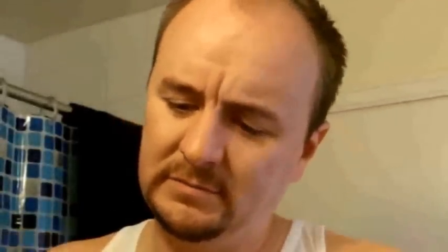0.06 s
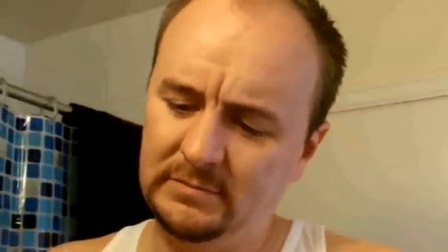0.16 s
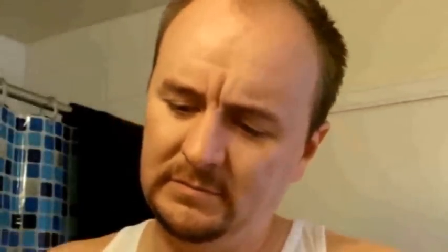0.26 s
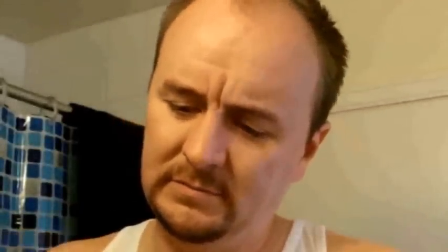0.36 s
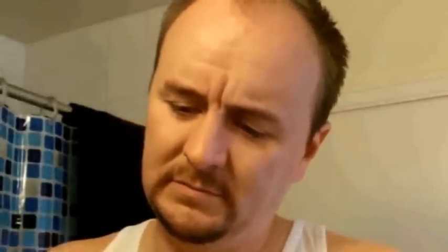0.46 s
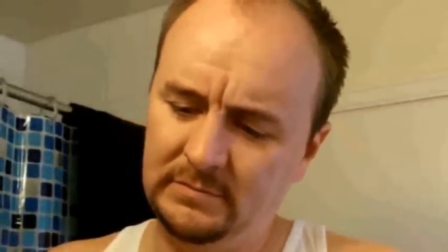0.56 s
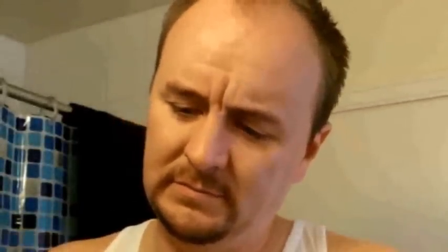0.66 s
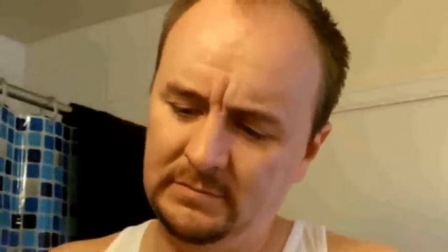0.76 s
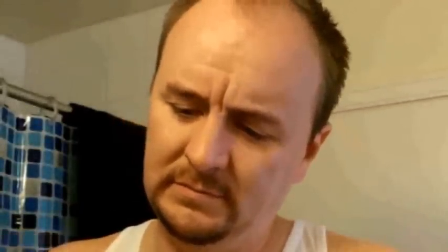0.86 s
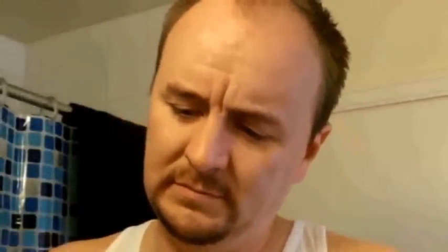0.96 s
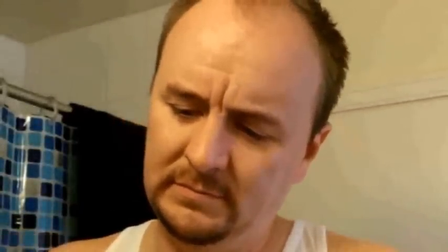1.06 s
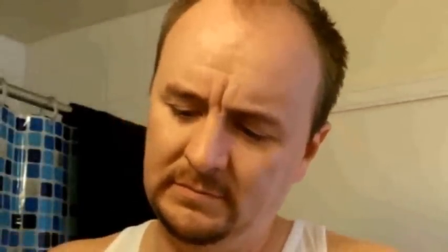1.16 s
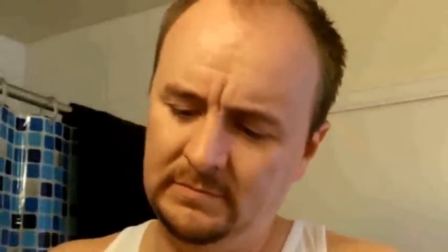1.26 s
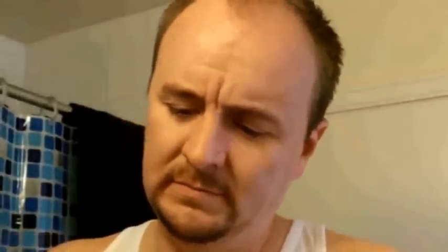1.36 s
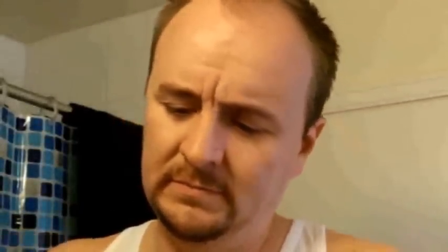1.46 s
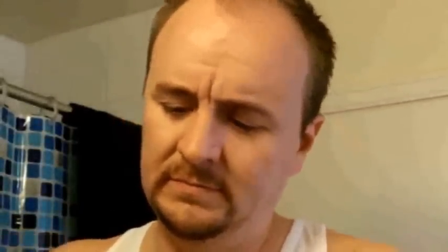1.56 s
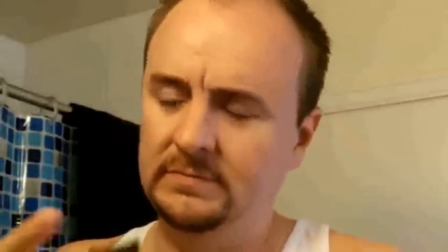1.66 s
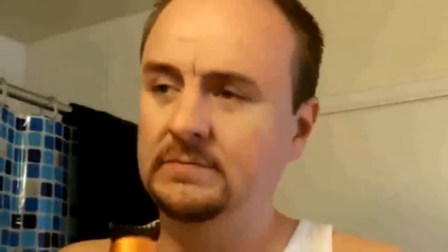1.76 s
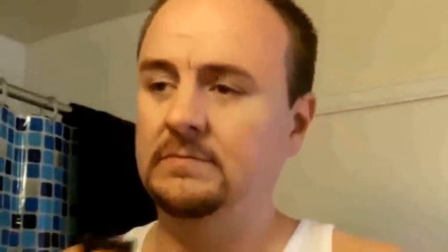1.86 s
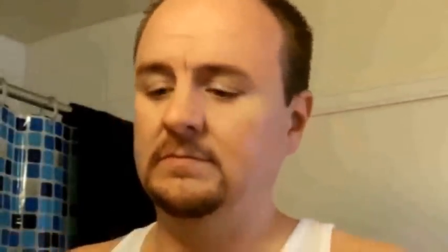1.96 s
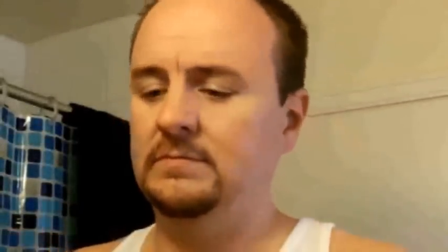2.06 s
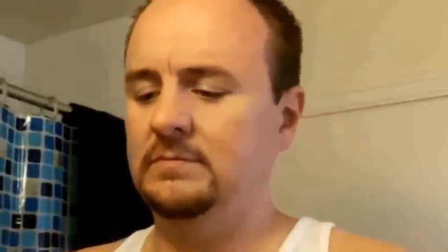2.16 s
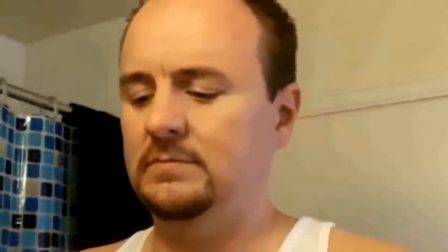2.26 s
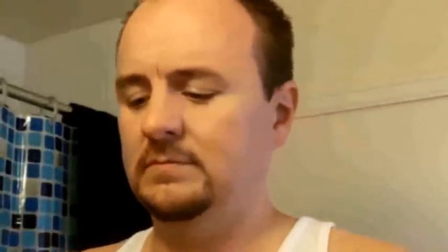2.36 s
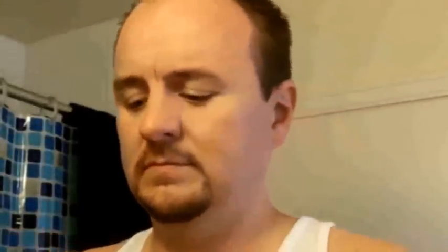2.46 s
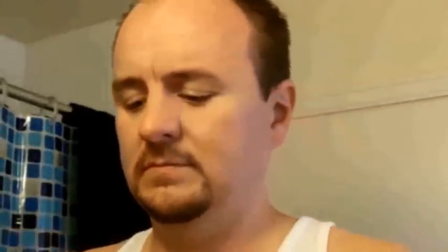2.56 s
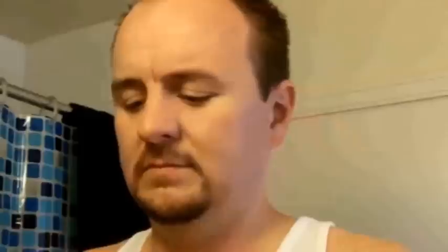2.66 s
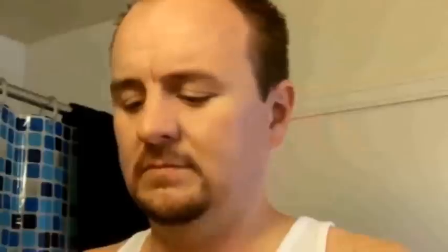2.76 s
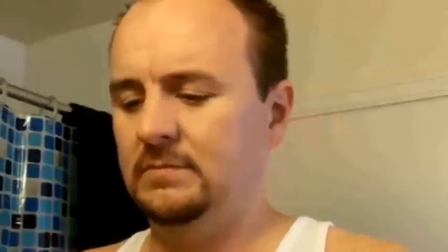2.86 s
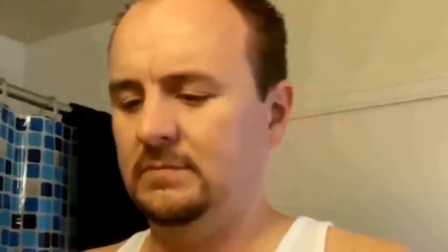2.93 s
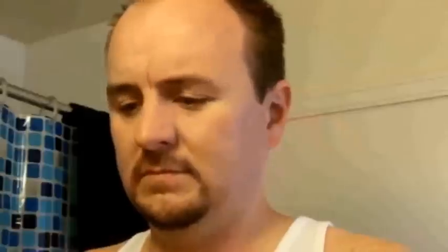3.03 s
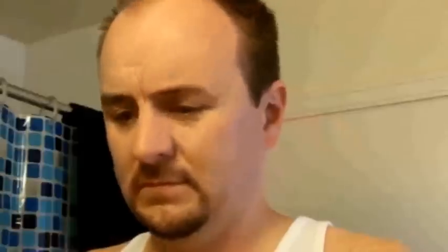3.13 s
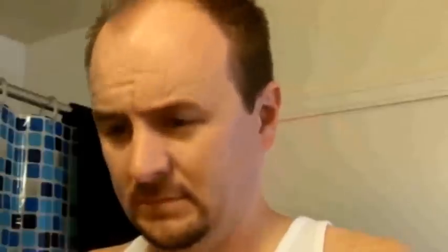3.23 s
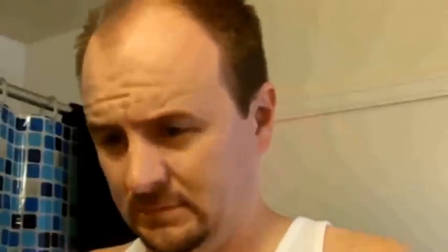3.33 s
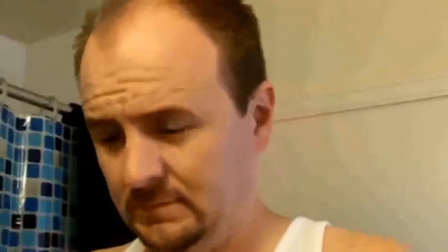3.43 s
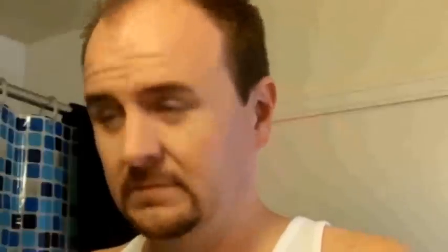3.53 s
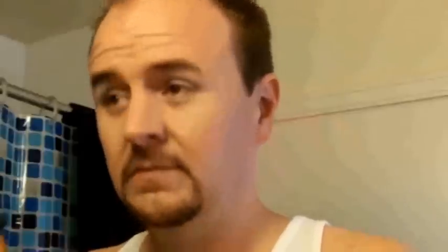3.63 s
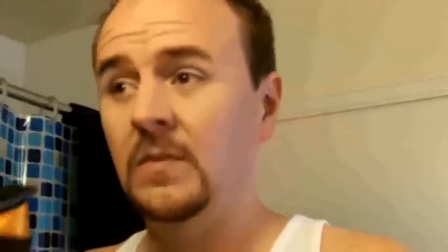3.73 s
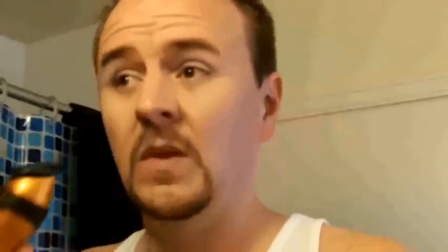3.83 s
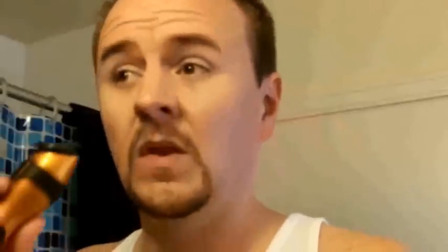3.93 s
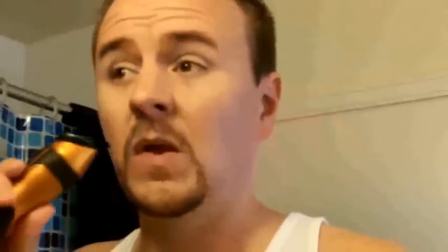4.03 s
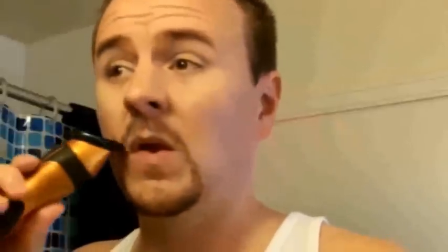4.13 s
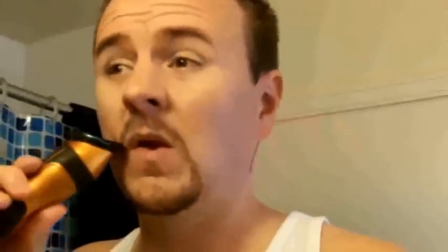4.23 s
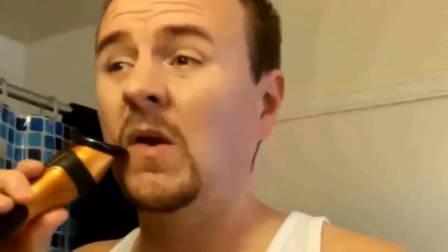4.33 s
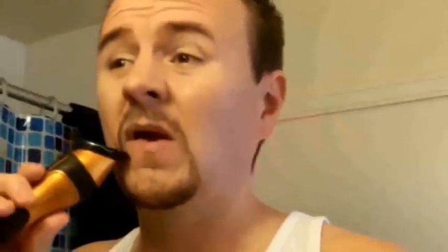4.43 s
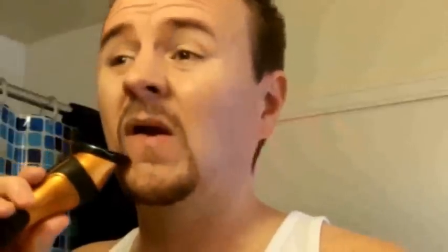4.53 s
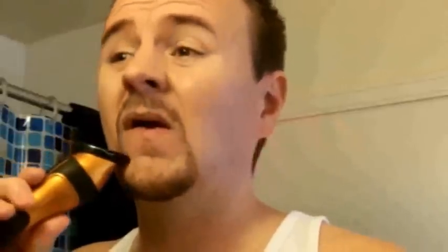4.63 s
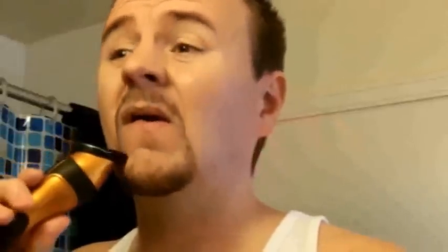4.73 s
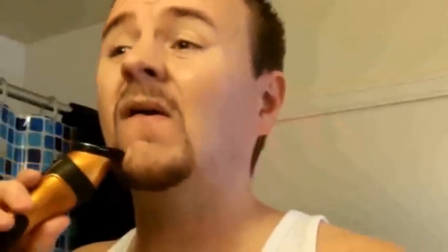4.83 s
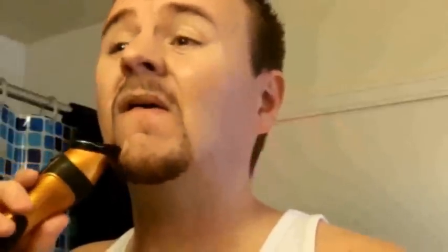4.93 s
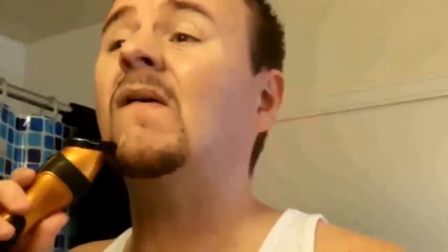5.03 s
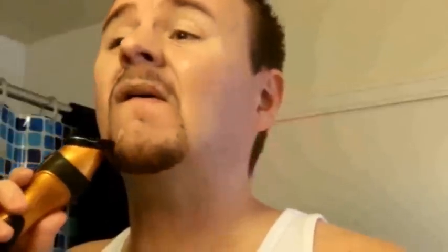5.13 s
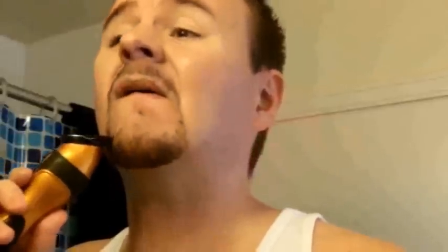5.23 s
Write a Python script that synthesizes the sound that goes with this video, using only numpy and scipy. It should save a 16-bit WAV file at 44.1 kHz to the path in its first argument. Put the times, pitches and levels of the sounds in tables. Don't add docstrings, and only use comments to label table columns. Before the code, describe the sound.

In a small tiled bathroom, a plastic comb ticks and rubs against a trimmer body, clicks over several notches and snaps home very loudly. A quiet gap follows with faint hand bumps and a reseating click. Then a switch clicks, the motor spins up fast and the blades buzz steadily, wavering slightly. Close phone microphone, bright around the upper mids, with short tile echoes.

```python
import sys
import numpy as np
from scipy import signal
from scipy.fft import rfft, irfft
from scipy.io import wavfile
from scipy.ndimage import uniform_filter1d, minimum_filter1d

SR = 44100
rng = np.random.default_rng(int(sys.argv[2]) if len(sys.argv) > 2 else 0)


def waveform_to_disk(signal):
    frames = np.transpose(np.atleast_2d(signal))
    scaled = np.clip(frames, -1, 1) * 32767
    samples = np.round(scaled).astype(np.int16)
    wavfile.write(sys.argv[1], SR, samples)


def natural_amplitude(level_db):
    exponent = np.asarray(level_db, float) / 20
    return 10 ** exponent


N = 233199
START_S = 3.45
FULL_SPEED, SETTLED_SPEED = 96, 95.2


def evened(x):
    return x / np.sqrt(np.mean(x ** 2) + 1e-20)


def read(points, hz):
    f, value = np.transpose(points)
    return np.interp(np.log(hz + 1), np.log(f + 1), value)


def add(mix, start_s, sound):
    part = mix[round(start_s * SR):][:len(sound)]
    part += sound[:len(part)]


def coloured(x, points):
    return irfft(rfft(x) * natural_amplitude(read(points, np.fft.rfftfreq(len(x), 1 / SR))), len(x))


def coloured_noise(count, points):
    return evened(coloured(rng.standard_normal(count), points))


def resonate(x, hz, width_hz):
    return signal.lfilter(*signal.iirpeak(hz, hz / width_hz, SR), x)


def drift(t, per_s, count):
    f, phase = rng.random((2, count, 12, 1))
    return np.sin(2 * np.pi * (per_s * f * t + phase)).sum(1) / np.sqrt(6)


def comb(jolts, db, hz, low_db, width_hz, boom_share):
    ring = resonate(jolts, hz, width_hz)
    ring = resonate(ring, hz, 3.6 * width_hz)
    ring = resonate(ring, hz, 2.0 * width_hz)
    bright = resonate(resonate(jolts, 5550, 2700), 7180, 5900)
    ring = ring + 0.37 * natural_amplitude(0.92 * db) * bright
    knock = resonate(resonate(jolts, 800, 1300), 1300, 3000)
    knock = knock + boom_share * resonate(jolts, 330, 370)
    return ring / abs(ring).max() + natural_amplitude(low_db - 1) * knock / abs(knock).max()


def click(db, hz, low_db, rattle_s):
    t = np.arange(2400) / SR
    hits = rng.standard_normal(2400) * (rng.random(2400) < .1)
    jolts = 2.16 * hits * np.exp(-t / max(rattle_s, .0004))
    jolts[0] = 1.25
    near = natural_amplitude(db) * comb(jolts, db, hz, low_db, width_hz=1365, boom_share=0.62)
    room_knock_db = -5
    around = comb(1. * (t == 0), db, hz, low_db + room_knock_db, width_hz=1740, boom_share=8.3)
    return near, around * np.linalg.norm(near) / np.linalg.norm(around)


# start_s, peak_db, ring_hz, room_db
FUMBLES = [(0.3034, -15, 3970, -13), (.3047, -16, 3570, -3.5), (0.312, -20.5, 3070, -1.5),
           (0.3408, -22.5, 3160, -10), (0.3805, -19, 4180, -9.5), (0.4506, -31, 2900, 1),
           (.4697, -26.5, 3900, -7), (0.517, -17, 3830, -10), (0.5207, -26, 2800, -2.5),
           (0.5657, -29.5, 3850, -5), (0.6235, -29.5, 2400, -11), (0.8204, -34.5, 3040, -5),
           (0.8495, -27.5, 3670, -9), (0.9366, -39, 2240, -13), (1.1083, -34, 2420, -6),
           (1.2100, -38, 4000, 5), (1.251, -33, 3950, -2), (1.309, -30.5, 4060, -13),
           (1.5244, -46, 4160, -11), (2.7186, -46, 2780, -5), (3.0160, -34, 3530, 5),
           (3.0808, -40, 3400, -16)]
# start_s, peak_db, ring_hz, room_db
NOTCHES = [
    (1.5466, -18, 4000, -8.5),
    (1.6148, -23, 3750, -9),
    (1.6685, -18.5, 3650, -10.5),
    (1.7367, -10, 4400, 5),
    (3.0254, -22.5, 4830, -5.5),
]
# start_s, peak_db, ring_hz, knock_rel_db, rattle_s
SNAPS = [
    (1.7364, -2, 4310, -14.5, 0.00073),
    (1.7687, 1.5, 4430, -26.5, 0.0024),
    (3.4448, -16.5, 3980, -19.5, 0.003),
]


def clicks():
    rows = []
    for s, db, hz, room_db in FUMBLES:
        pressed_db = 4.5 * (s < .7)
        knock_db = -16 + pressed_db - 9 * np.log2(hz / 3000)
        rows.append((s, db, hz, room_db, knock_db, 0.0036 * (3000 / hz) ** 2.6))
    notch_knock_db, notch_rattle_s, snap_room_db = -33, .0012, -3.5
    rows += [(*row, notch_knock_db, notch_rattle_s) for row in NOTCHES]
    return rows + [(s, db, hz, snap_room_db, *rest) for s, db, hz, *rest in SNAPS]


# start_s, length_s, level_db, squeak_hz
SCRAPES = [
    (0.294, 0.0068, -57, 3680),
    (0.527, 0.0224, -48, 1410),
    (0.568, .088, -58, 1320),
    (1.209, 0.059, -57.5, 2400),
    (1.725, 0.028, -41, 4960),
]


def scrape(length_s, db, squeak_hz):
    slips = rng.standard_normal(4000) * natural_amplitude(1.1 * rng.exponential(1, 4000))
    rub = evened(resonate(slips, squeak_hz, 220)) + evened(resonate(slips, 3500, 2200))
    count = round(length_s * SR)
    return natural_amplitude(db) * rub[:count] * signal.windows.tukey(count, .3)


# start_s, peak_db, ring_hz, length_s
BUMPS = [
    (2.848, -40, 750, 0.035),
    (2.875, -45, 813, 0.06),
    (2.922, -49, 724, 0.06),
]


def bump(db, hz, length_s):
    t = np.arange(4000) / SR
    push = rng.standard_normal(4000) * np.exp(-t / length_s * 3)
    thud = resonate(resonate(push, hz, 750), hz, 750)
    return natural_amplitude(db) * thud / abs(thud).max()


# delay_s, level_db
WALLS = [(.0016, -20), (.0043, -10), (.0085, -17), (0.0167, -30)]


def handling():
    direct, wet = np.zeros((2, N))
    for s, db, hz, room_db, low_db, rattle_s in clicks():
        near, around = click(db, hz, low_db, rattle_s)
        add(direct, s, near)
        add(wet, s, natural_amplitude(room_db) * around)
    for s, length_s, db, hz in SCRAPES:
        add(direct, s, scrape(length_s, db, hz))
    for s, db, hz, length_s in BUMPS:
        add(direct, s, bump(db, hz, length_s))
    echoes = sum(natural_amplitude(db) * np.roll(direct, round(s * SR)) for s, db in WALLS)
    return direct + echoes, wet


# time_s, speed_turns_per_s
RUNNING = [(3.9, 95.3), (4.2, 96.15), (4.44, 96.8), (4.64, 97.1), (4.73, 97.05), (4.8, 96.05), (4.94, 96.4),
           (5.1, 97.0), (5.3, 97.4)]


def shaft(t):
    kick, spin_up_s, shape = .315, .083, 1.5
    behind = (1 - kick) * np.exp(-(np.maximum(t - START_S, 0) / spin_up_s) ** shape)
    return np.interp(t, *np.transpose(RUNNING)) * (1 - behind)


# ring_hz, width_hz, level_db
CASING = [(765.4, 14, -56), (1159, 16.3, -40), (1339, 27, -42), (1439, 8.8, -40.5), (1457, 6.8, -33.5),
          (1533, 21, -41), (2116, 57, -38.5), (2227, 45, -31), (2339, 42, -37.5), (2680, 48, -37.5),
          (2714, 29, -49)]
# ring_hz, width_hz, level_db
CASING_UPPER = [(3042, 5.3, -33.5), (3204, 5.3, -41), (3456, 68, -45.5), (3430, 8, -38), (3600, 25, -36),
                (3700, 31, -61), (3776, 40, -30), (4060, 26, -45), (4000, 11, -52), (4194, 15, -47),
                (4210, 39, -39.5), (4370, 48, -38), (4510, 26, -33.5), (5000, 30, -37)]


def singing(t, speed, turns):
    modes, out = CASING + CASING_UPPER, 0
    waver = np.repeat(drift(t[::64], 12.0, count=len(modes)), 64, axis=1)[:, :len(t)]
    for (hz, width_hz, db), w in zip(modes, waver):
        k = np.round(hz / speed)
        near = 1 / (1 + (2 * (k * speed - hz) / width_hz) ** 2)
        near = near * np.cos(np.pi * (hz / speed - k)) ** 2
        phase = 2 * np.pi * k * turns + (k < 30) * k ** 2
        out = out + np.sqrt(2) * natural_amplitude(db + 1.1 * w) * near * np.cos(phase)
    ring_from = 92.5
    return out * np.clip((speed - ring_from) / (SETTLED_SPEED - ring_from), 0, 1) ** 2


# freq_hz, level_db
CHATTER = [(700, -17), (1100, -7), (1500, -5.5), (2200, -1.5), (2500, -3.5), (3000, -2), (3600, 2.5),
           (4400, -1), (5100, -3.5), (5500, -13.5), (6500, -19), (7300, -34.5), (7800, -61)]


def chatter(t, speed, turns, tilt_db, knock):
    order = np.arange(11, 80)[:, None]
    slow = slice(None, None, 64)
    f = order * speed[slow]
    a, b = drift(t[slow], 3.0, count=2 * len(order)).reshape(2, len(order), -1)
    return_knock = .45
    straight = np.exp(-((f - 4000) / 1100) ** 2) * knock[slow]
    straight = straight * (1 - return_knock * (-1.) ** order) * .85
    z = natural_amplitude(read(CHATTER, f) + tilt_db[slow] * np.log2(f / 2500))
    z = z * (straight + .65 * (a + 1j * b))
    sung = [round(hz / FULL_SPEED) for hz, *_ in CASING + CASING_UPPER]
    z = z * np.where(np.isin(order, sung), .4, 1)
    lines = 0
    for k, row in zip(order[:, 0], z):
        lines = lines + (np.interp(t, t[slow], row) * np.exp(2j * np.pi * k * turns)).real
    power = uniform_filter1d((abs(z) ** 2).sum(0), 200)
    return lines / np.sqrt(np.interp(t, t[slow], power) / 2)


def rubbing(strokes, tilt_db):
    def tilted(db_per_octave):
        points = [(hz, db + db_per_octave * np.log2(hz / 2500)) for hz, db in CHATTER]
        return coloured_noise(len(strokes), points)
    mix = np.clip(.5 + tilt_db / 8, 0, 1)
    return evened(strokes * (np.sqrt(1 - mix) * tilted(-4) + np.sqrt(mix) * tilted(4)))


# freq_hz, level_db
LOOSE = [(500, -7), (800, -11.5), (1600, 4), (2200, 0.5), (3000, -13), (5000, 5.5), (6500, -7.5),
         (7500, -12.5), (8500, -13)]


def loose_blades(t, strokes):
    rise_s, until_s, fade_s = 0.083, 3.66, 0.21
    rattle = strokes * coloured_noise(len(t), LOOSE) * natural_amplitude(-33.5)
    rise = np.minimum((t - START_S) / rise_s, 1)
    return rattle * rise * np.exp(-(np.maximum(t - until_s, 0) / fade_s) ** 2)


# shaft_order, level_db
LOW_ORDERS = [(1, -64.5), (2, -74), (3, -58.5), (4, -55.5), (5, -54), (6, -63), (7, -60.5), (8, -52),
              (9, -50), (10, -74.5)]


def motor_hum(t, turns):
    sway = drift(t, 4.0, count=len(LOW_ORDERS))
    out = 0
    for (k, db), w in zip(LOW_ORDERS, sway):
        out = out + natural_amplitude(db + 1.6 * w) * np.sqrt(2) * np.cos(2 * np.pi * (k * turns + rng.random()))
    return out


# freq_hz, density_db_per_hz
TOP = [(7000, -61), (8000, -26.5), (8600, 4), (9200, 1.5), (9800, 14), (10200, -2), (11000, 2),
       (11900, 1.5), (12300, 14), (12600, 3.5), (13000, -30.5)]


def blade_fizz(t):
    return coloured_noise(len(t), TOP) * natural_amplitude(-45 + 2.0 * drift(t, 4.0, count=1)[0])


# time_s, chatter_db, tilt_db_per_octave, straight_knock
HAND = [(3.6, -27.5, -4, 0.33), (3.76, -31.5, 0.5, 0.15), (3.88, -26, 1.5, 0.44), (4.1, -27, 1.5, .8),
        (4.32, -27, 1, 0.37), (4.46, -26.5, 2.5, 1), (4.72, -28.5, 1.5, 2), (4.82, -26, 1.5, 1.14),
        (5.0, -27, 1.5, 1.3), (5.3, -29, 1.5, 0.75)]


def trimmer():
    t = np.arange(START_S, N / SR, 1 / SR)
    time_s, *columns = np.transpose(HAND)
    db, tilt_db, knock = (np.interp(t, time_s, c) for c in columns)
    speed = shaft(t)
    turns = np.cumsum(speed) / SR
    db = db + 20 * 1.52 * np.log10(speed / FULL_SPEED)
    noisy = np.clip(.19 + 1.1 * np.maximum(1 - speed / SETTLED_SPEED, 0) ** .5, 0, .8)
    strokes = 1 + .5 * np.cos(2 * np.pi * turns) + 0.39 * np.cos(4 * np.pi * turns)
    lines = natural_amplitude(db) * np.sqrt(1 - noisy) * chatter(t, speed, turns, tilt_db, knock)
    hiss = natural_amplitude(db) * np.sqrt(noisy) * rubbing(strokes, tilt_db) + loose_blades(t, strokes)
    hiss = signal.lfilter(*signal.butter(2, 450, 'high', fs=SR), hiss)
    steady = (motor_hum(t, turns) + blade_fizz(t)) * (speed / FULL_SPEED) ** 3
    out = np.zeros(N)
    add(out, t[0], lines + hiss + singing(t, speed, turns) + steady)
    return out


# freq_hz, t60_s
TILES = [(250, 0.51), (1000, 1), (2500, 0.43), (5000, 0.45), (8000, 0.32)]


def room(x):
    at = np.arange(200, SR - 20, 20)
    taps = np.zeros(SR)
    taps[at + rng.integers(0, 20, len(at))] = rng.choice([-1., 1.], len(at))
    hz, t, z = signal.stft(taps, SR, nperseg=256)
    decay = natural_amplitude(-60 * t / read(TILES, hz)[:, None])
    tail = signal.istft(z * decay, SR, nperseg=256)[1]
    return signal.fftconvolve(x, tail / np.linalg.norm(tail))[:N]


# freq_hz, density_db_per_hz
AIR = [(20, -9), (60, -8.5), (100, -9.5), (130, -13.5), (190, -13), (250, -8.5), (420, -11.5), (600, -14.5),
       (1000, -16.5), (4300, -20), (7000, -25), (9000, -17), (12000, -16)]
# freq_hz, level_db
HUM = [(57.6, -85.5), (119.5, -63.5), (142, -66)]
# freq_hz, density_db_per_hz
FADING = [(88, -19), (150, 1), (177, -23), (271, -0.5), (403, 1), (469, -10.5), (626, -7.5), (1130, -13.5),
          (1350, -14.5), (1960, -10), (4000, -17), (5200, -29), (8800, -120)]


def bathroom():
    t = np.arange(N) / SR
    out = natural_amplitude(-53) * coloured_noise(N, AIR)
    waver = drift(t, 7.4, count=len(HUM))
    for (hz, db), w in zip(HUM, waver):
        out = out + natural_amplitude(db + 0.5 * w) * np.sqrt(2) * np.sin(2 * np.pi * hz * t + .5 * w)
    fading_db, fading_t60_s = -50, 1.57
    return out + coloured_noise(N, FADING) * natural_amplitude(fading_db - 60 * t / fading_t60_s)


def scene():
    direct, wet = handling()
    motor = trimmer()
    motor_room_db = -12
    return (direct + motor + room(wet + natural_amplitude(motor_room_db) * motor) + bathroom())[None]


def thinned(x, under_db=-38, quiet_db=-101, patchy_db=3):
    hz, _, z = signal.stft(x, SR, nperseg=1024, noverlap=768)
    power = uniform_filter1d(abs(z) ** 2, size=9, axis=1)
    band_db = 10 * np.log10(uniform_filter1d(power, size=7, axis=0) + 1e-16)
    mask_db = 10 * np.log10(power.mean(0) * natural_amplitude(2 * under_db) + natural_amplitude(2 * quiet_db))
    patches = uniform_filter1d(rng.standard_normal(z.shape), size=6, axis=0)
    patches = evened(uniform_filter1d(patches, size=20, axis=1))
    kept = (band_db > mask_db + patchy_db * patches) | (hz[:, None] < 6900)
    return signal.istft(z * np.maximum(kept, .02), SR, nperseg=1024, noverlap=768)[1][:N]


def ducked(x):
    peak_db = 20 * np.log10(-minimum_filter1d(-abs(x), 100) + 1e-9)
    fall_db = np.arange(N) * 95.0 / SR
    held_db = np.maximum.accumulate(peak_db + fall_db) - fall_db
    over_db = np.clip(held_db + 12.5, 0, 11)
    return x / natural_amplitude(np.roll(uniform_filter1d(over_db, 150), 200))


def band_limit(x):
    return signal.sosfilt(signal.butter(12, 12660, fs=SR, output="sos"), x)


# freq_hz, gain_db
MICROPHONE = [(20, 5.5), (6300, -0.5), (7100, -3.5), (7500, -20.5), (7900, -30), (8300, -14), (8700, -10.5),
              (10000, -13.5), (10500, -17.5), (11100, -33.5), (11600, -19.5), (12400, -25), (12700, -37)]


def record(dry):
    heard = ducked(coloured(dry[0], MICROPHONE))
    return band_limit(thinned(heard)[None])


dry = scene()
out = record(dry)
waveform_to_disk(out)
```